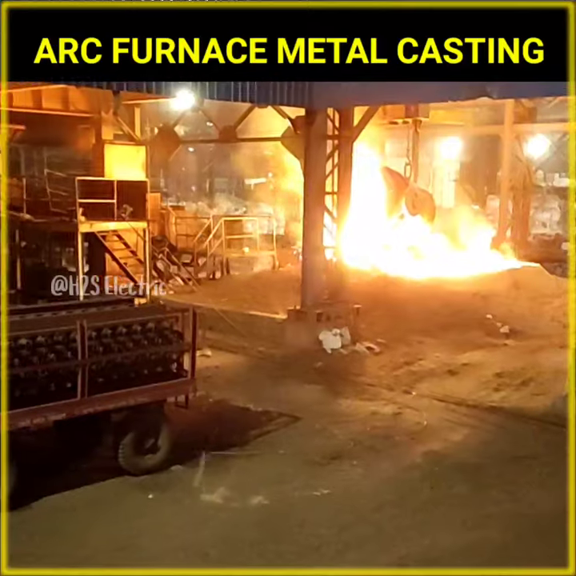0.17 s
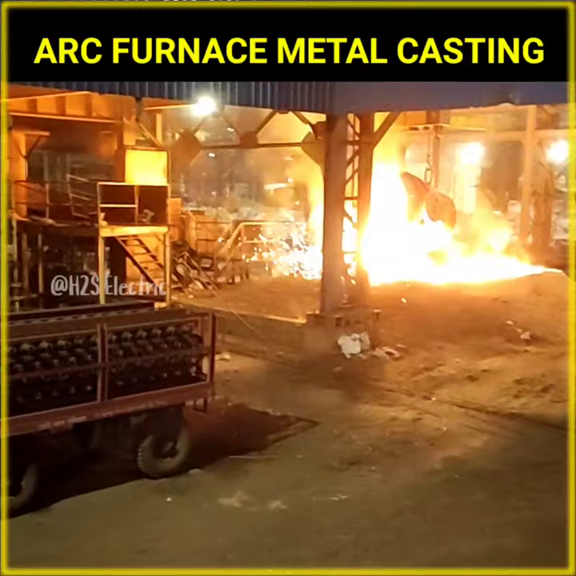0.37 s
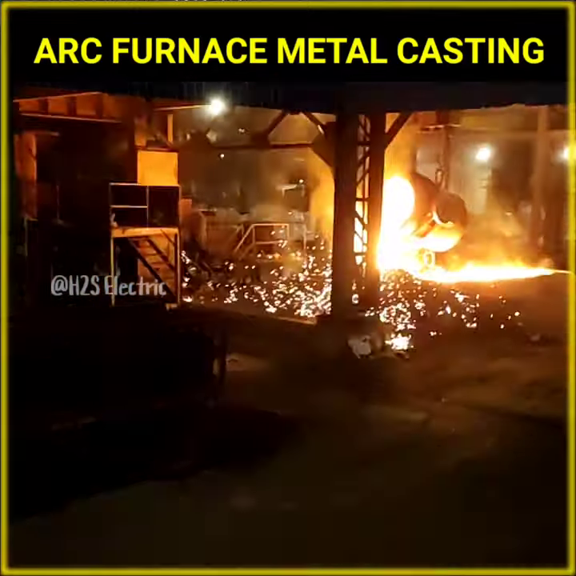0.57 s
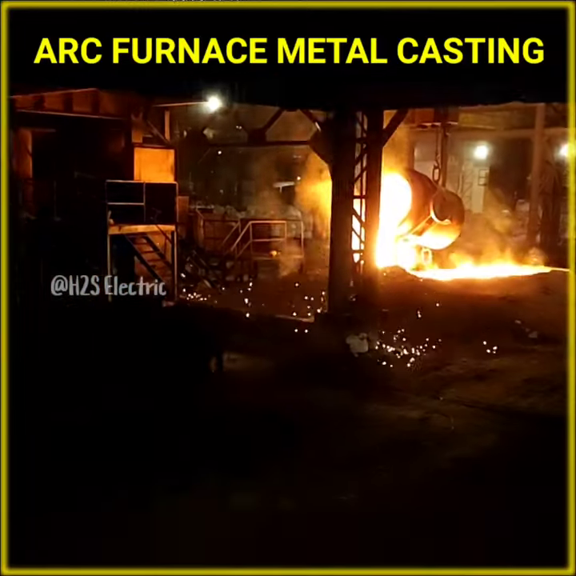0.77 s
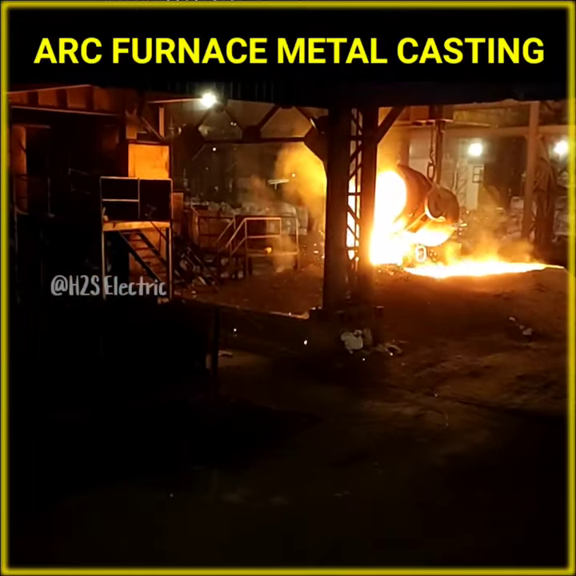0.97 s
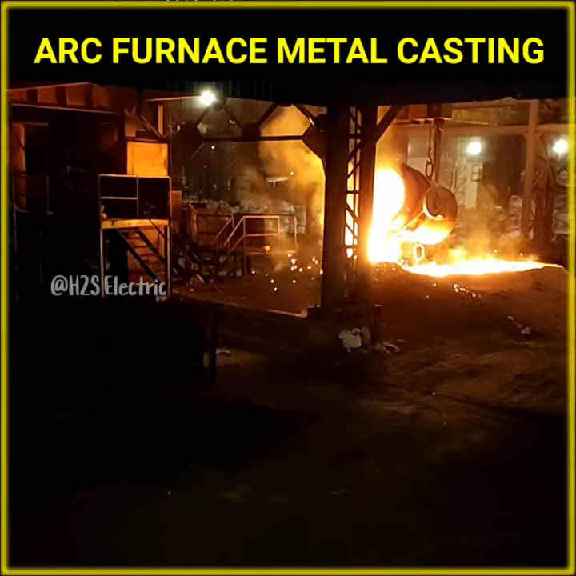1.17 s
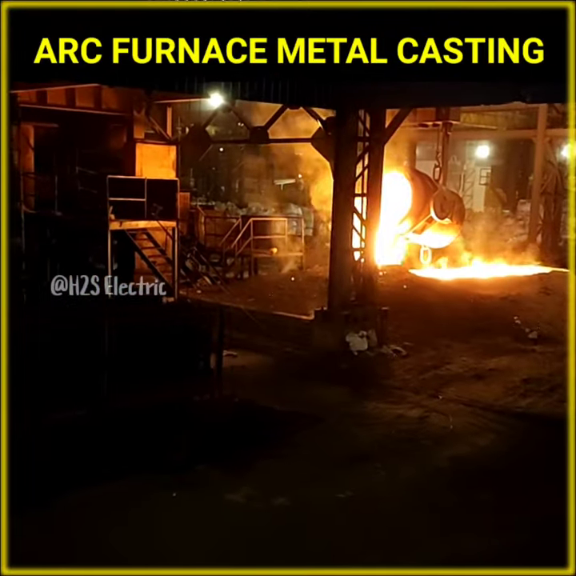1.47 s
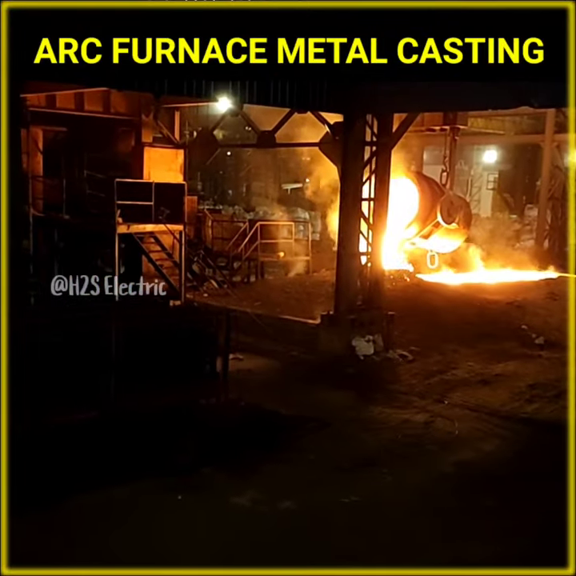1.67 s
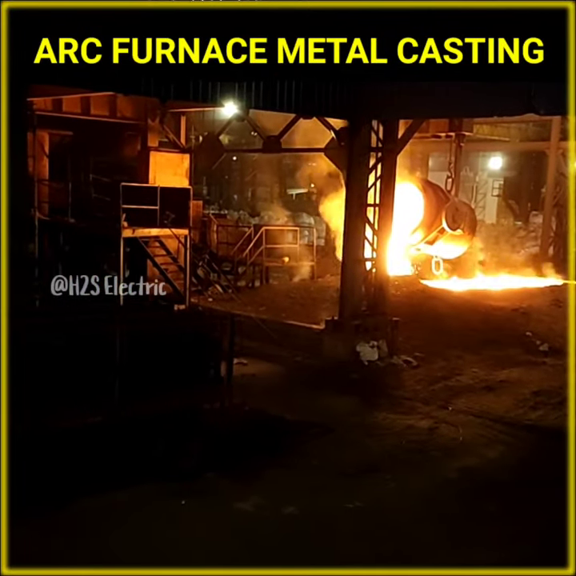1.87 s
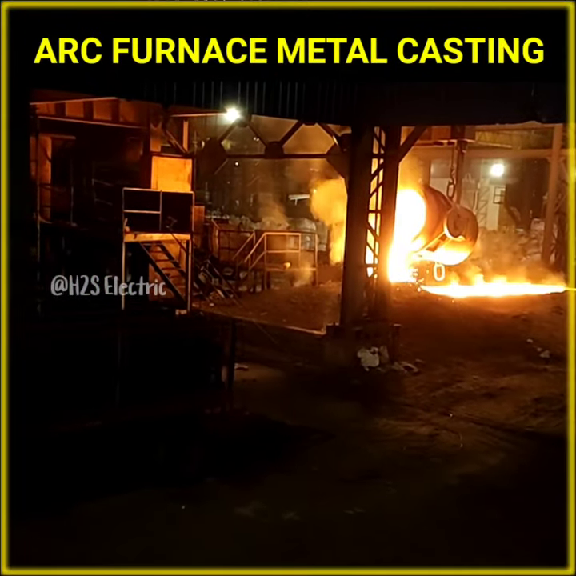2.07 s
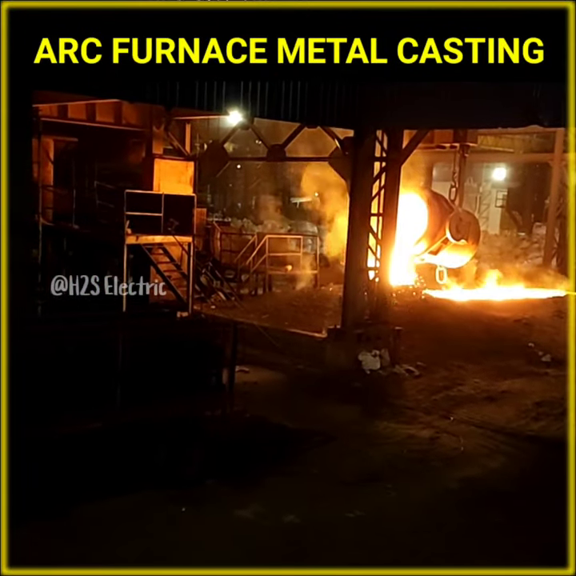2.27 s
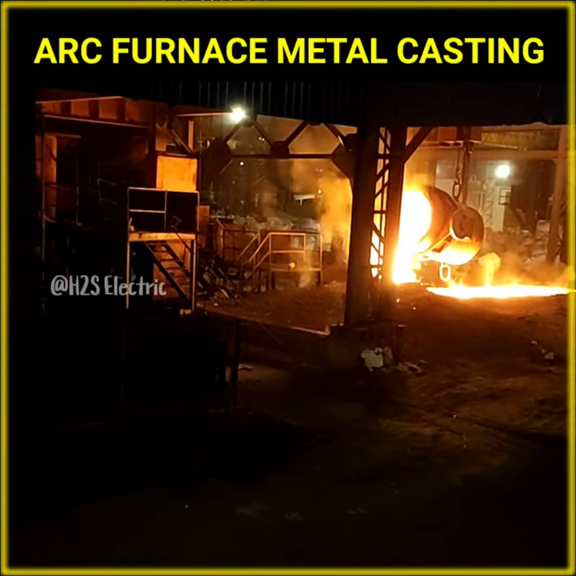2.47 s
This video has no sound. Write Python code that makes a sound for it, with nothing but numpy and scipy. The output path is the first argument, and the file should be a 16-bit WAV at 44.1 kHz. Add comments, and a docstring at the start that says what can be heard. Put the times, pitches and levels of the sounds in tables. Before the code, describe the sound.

A furnace roar comes in at about 0.2 seconds after a brief silence and stays steady, broad and burning, with a low, wavering ring from its shell and motors humming underneath. Faint, distant puffs of air come between 0.3 and 1.2 seconds. At about 2.1 seconds a close valve spits a bright hiss, whistling faintly as it shuts by 2.4. One last far puff follows near 2.6 seconds.

```python
"""After a short silence, two small microphones switch on and fade up in a foundry's furnace hall.
A broad burning roar fills it and makes the furnace shell ring near 350 Hz, over the hum of motors.
A few faint puffs of leaking air sound further off. Just after two seconds, compressed air spits once
through a valve, close and bright, whistling faintly as it shuts. One last far puff follows."""
import sys
import numpy as np
from scipy import signal
from scipy.io import wavfile
from scipy.ndimage import uniform_filter1d, minimum_filter1d

SR = 44100
rng = np.random.default_rng(int(sys.argv[2]) if len(sys.argv) > 2 else 0)


def file_out(sig):
    """Save sig as 16-bit WAV at sys.argv[1]."""
    # one column per channel
    cols = np.atleast_2d(sig).T
    # limit, then scale
    lim = np.clip(cols, -1, 1)
    pcm = np.round(lim * 32767).astype(np.int16)
    wavfile.write(sys.argv[1], SR, pcm)


N = 115983

# How strong the roar is from bass to treble: pitch_hz, level_db
ROAR_COLOUR = [(25, -24.5), (87, -49), (130, -37), (170, -23.5), (250, -15.5), (300, -13.5), (350, -5),
               (430, -13), (620, -16), (750, -17), (1100, -21.5), (1600, -23.5), (2000, -28), (3500, -32),
               (3900, -37.5), (5000, -40), (8500, -46), (10500, -51), (13500, -56), (14200, -57),
               (16000, -71)]
# Small rises and dips of the roar: time_s, level_db
ROAR_LOUDNESS = [(.2, -1), (.35, 0.5), (.45, -1.5), (.6, 0), (.8, 0), (.9, -1.5), (1.0, -1), (1.1, -1),
                 (1.3, 0), (1.45, -1), (1.7, 0), (1.85, -0.5), (1.95, 0.5), (2.07, -0.5), (2.3, -1),
                 (2.42, -0.5), (2.63, 0)]
# How alike the roar is at the two microphones: pitch_hz, likeness_0_to_1
ROAR_LIKENESS = [(25, .7), (90, 0.87), (200, 1), (350, 0.99), (600, 0.77), (1200, 0.78), (2500, 0.35),
                 (5000, 0.36), (9000, 0), (14000, 0.05)]
# Which side the roar leans to: pitch_hz, left_over_right_db
ROAR_BALANCE = [(60, -5.5), (240, 2), (500, -1.5), (1100, 1), (1800, -2.5), (2700, -2), (4200, -3),
                (6400, -2), (9800, .5), (15000, 1.5)]


def furnace_roar(level_db=-22, patch_db=1, flicker_db=0.27, swell_db=0.46):
    """Swirling flame and draught make a broad noise that shifts in patches, flickers and swells."""
    size, hop = 1024, 256
    frame_t, hz = np.arange(N // hop + 5) * hop / SR, np.fft.rfftfreq(size, 1 / SR)
    shape = (len(hz), len(frame_t))
    patches = patch_db * blotches(shape, bands=20, frames=10)
    flicker = flicker_db * blotches(shape, bands=200, frames=3)
    swell = swell_db * drift(5.91, frame_t)
    colour_db = at_pitch(ROAR_COLOUR, hz)[:, None] + patches + flicker - swell
    likeness, balance_db = at_pitch(ROAR_LIKENESS, hz), at_pitch(ROAR_BALANCE, hz)
    noise = stereo_noise(colour_db, size, likeness, right_lag_s=0.00008, balance_db=balance_db)
    return noise * gain_of(level_db + at_time(ROAR_LOUDNESS, np.arange(N) / SR))


# The notes the furnace shell rings at, loudest first: pitch_hz, width_hz, relative_level_db
SHELL_NOTES = [(350.4, 40, -3), (396, 30, -10), (590, 58, -15), (502.4, 40, -16)]
# How loud the whole ringing is: time_s, level_db
SHELL_LOUDNESS = [(.2, -21.5), (.25, -20.5), (.37, -23), (.45, -19.5), (.7, -22), (1.0, -19), (1.25, -21.5),
                  (1.6, -20), (2.02, -20), (2.065, -31), (2.11, -24), (2.17, -22.5), (2.3, -20),
                  (2.45, -22.5), (2.63, -20)]
# Extra level for all notes but the lowest: time_s, boost_db
UPPER_NOTE_BOOST = [(.2, 3), (.3, 4), (.45, 4), (.55, -1), (1.0, -2), (1.45, -1), (1.65, 3), (1.9, 0),
                    (2.1, 3), (2.35, 1), (2.63, 0)]


def shell_ring(wander_share=0.01, steady_s=0.16):
    """The flame shakes the shell, which rings at a few restless notes."""
    t, out = np.arange(N) / SR, np.zeros(N)
    for note, (hz, width_hz, db) in enumerate(SHELL_NOTES):
        pitch = hz * (1 + wander_share * drift(12, t))
        ring = resonate(rng.standard_normal(N), pitch, width_hz)
        ring = resonate(ring, pitch, 2 * width_hz)
        # Even out the slow swings and keep the fast churning.
        slow_power = abs(uniform_filter1d(ring ** 2, round(steady_s * SR)))
        ring = ring / np.sqrt(slow_power + 1e-20)
        boost_db = at_time(UPPER_NOTE_BOOST, t) if note > 0 else 0
        out += gain_of(db + boost_db) * ring
    return out * gain_of(at_time(SHELL_LOUDNESS, t))


# The one spit of air as the valve closes: time_s, level_db, opening_0_to_1
JET_SPIT = [(2.13, -37, 1), (2.137, -29, 1), (2.16, -30.5, 0.7), (2.172, -34.5, 0.4), (2.205, -37, 0.44),
            (2.23, -35.5, 0.3), (2.258, -34, .3), (2.277, -39, 0.25), (2.295, -43.5, 0), (2.36, -48, 0),
            (2.4, -58, 0)]
# The bright hiss of the wide-open valve: pitch_hz, level_db
OPEN_VALVE_COLOUR = [(1500, -10), (3000, 0), (4500, -0.5), (6000, 0.5), (8000, 4.5), (10500, -3),
                     (13500, 4.5), (16000, -5)]
# The duller hiss of the nearly shut valve: pitch_hz, level_db
SHUT_VALVE_COLOUR = [(1500, -23), (3000, -5), (4250, 0), (4650, 3), (5600, -3), (8600, -4), (10500, -13),
                     (13500, -13), (16000, -17)]


def air_jet(whistle_hz=4590, whistle_db=-10):
    """Compressed air bursts through a valve; as it closes, the hiss dulls and the valve seat whistles."""
    size, hop = 256, 64
    frame_t, hz = np.arange(N // hop + 5) * hop / SR, np.fft.rfftfreq(size, 1 / SR)
    t = np.arange(N) / SR
    times, level_db, opening = np.transpose(JET_SPIT)
    open_share = np.interp(frame_t, times, opening)
    bright = gain_of(at_pitch(OPEN_VALVE_COLOUR, hz))[:, None]
    dull = gain_of(at_pitch(SHUT_VALVE_COLOUR, hz))[:, None]
    colour = open_share * bright + (1 - open_share) * dull
    colour = colour / np.sqrt((colour ** 2).mean(0))  # every blend is equally strong
    hiss = stereo_noise(20 * np.log10(colour), size, likeness=0.27, right_lag_s=0.00001)
    whistle = normalize(resonate(rng.standard_normal(N), np.full(N, whistle_hz), width_hz=110))
    whistle *= gain_of(whistle_db) * (1 - np.interp(t, times, opening))
    flowing = (t > times[0]) & (t < times[-1])
    return (hiss + whistle) * gain_of(np.interp(t, times, level_db)) * flowing


# The tones of the motors: pitch_hz, level_db
MOTOR_TONES = [(202.5, -41), (405, -36), (593, -39), (809, -44), (1217, -50), (496, -41)]


def motor_hum(width_hz=5.1, wander_share=0.0017, waver_db=1):
    """The hall smears each motor tone into a narrow, wavering band of noise."""
    t, out = np.arange(N) / SR, np.zeros(N)
    for hz, db in MOTOR_TONES:
        pitch = hz * (1 + wander_share * drift(4.93, t))
        loudness = gain_of(db + waver_db * drift(8, t))
        tone = resonate(rng.standard_normal(N), pitch, width_hz)
        out += loudness * normalize(resonate(tone, pitch, width_hz))
    return out


# Faint puffs of air: start_s, length_s, level_db, pitch_hz
FAR_PUFFS = [(0.32, 0.092, -47, 7500), (0.667, 0.045, -49, 7000), (0.934, 0.058, -50, 7000),
             (1.14, 0.043, -46, 7040), (2.552, 0.074, -46, 7500)]


def distant_puffs(width_hz=3200):
    """Air leaks far away in short hisses, soft at both ends."""
    t, out = np.arange(SR // 5) / SR, np.zeros((2, N + SR))
    for start_s, length_s, db, hz in FAR_PUFFS:
        pitch, start = np.full(len(t), hz), round(start_s * SR)
        hiss = resonate(rng.standard_normal((len(t), 2)).T, pitch, width_hz)
        hiss = normalize(resonate(hiss, pitch, width_hz))
        rise_and_fall = np.sin(np.pi * np.clip(t / length_s, 0, 1))
        out[:, start:start + len(t)] += gain_of(db) * rise_and_fall * hiss
    return out[:, :N]


def gain_of(db):
    """Turns decibels into a number to multiply by."""
    return 10 ** (np.asarray(db) / 20)


def normalize(x):
    """Scales a signal to an average power of 1."""
    return x / np.sqrt(np.mean(x ** 2) + 1e-20)


def at_pitch(table, hz):
    """Reads between a table's rows along a musical (logarithmic) pitch scale."""
    pitches, values = np.transpose(table)
    return np.interp(np.log(hz + 1), np.log(pitches + 1), values)


def at_time(table, t):
    """Reads between a table's rows at the times t."""
    return np.interp(t, *np.transpose(table))


def drift(fastest_hz, t):
    """A slow random wobble around zero, made of 20 waves."""
    rates = np.geomspace(fastest_hz / 20, fastest_hz, num=20)
    wobble = sum(np.sin(2 * np.pi * (hz * t + rng.random())) / np.sqrt(hz) for hz in rates)
    return normalize(wobble - wobble.mean())


def blotches(shape, bands, frames):
    """Random ups and downs, blurred across pitch bands and time frames."""
    specks = rng.standard_normal(shape[::-1]).T
    return normalize(uniform_filter1d(uniform_filter1d(specks, bands, axis=0), frames, axis=1))


def resonate(x, pitch_hz, width_hz):
    """Makes x ring around a pitch that may move; a narrower width rings longer."""
    turn = np.exp(2j * np.pi * np.cumsum(pitch_hz) / SR)
    decay = np.exp(-np.pi * width_hz / SR)
    return 2 * (turn * signal.lfilter([1 - decay], [1, -decay], x / turn)).real


def stereo_noise(colour_db, size, likeness, right_lag_s, balance_db=0):
    """Noise, partly alike at two microphones, shaped by colour_db (pitch bands by time frames)."""
    hz = np.fft.rfftfreq(size, 1 / SR)[:, None]
    likeness, lean = np.reshape(likeness, (-1, 1)), gain_of(balance_db / 2).reshape(-1, 1)
    draws = rng.standard_normal(colour_db.shape[::-1] + (4,)).T
    left, unrelated = draws[0] + 1j * draws[1], draws[2] + 1j * draws[3]
    delayed = left * np.exp(-2j * np.pi * hz * right_lag_s)
    right = likeness * delayed + np.sqrt(1 - likeness ** 2) * unrelated
    spectra = np.array([left * lean, right / lean]) * gain_of(colour_db)
    return normalize(signal.istft(spectra, nperseg=size, noverlap=size * 3 // 4)[1][:, :N])


def scene():
    """The furnace, the motors and the escaping air sound together."""
    return furnace_roar() + shell_ring() + motor_hum() + air_jet() + distant_puffs()


# How the microphones fade up once switched on: time_s, gain_db
MIC_FADE_UP = [(.1545, -5.5), (.19, -6), (.2, 1.5), (.225, 1.5)]


def record(dry, switch_on_s=0.0034, ceiling_db=-9, hold_s=0.0045, smooth_s=0.0043):
    """The microphones switch on and fade up; loud peaks, deep bass and the top treble are held down."""
    t = np.arange(N) / SR
    switch_on = np.sin(np.pi / 2 * np.clip((t - MIC_FADE_UP[0][0]) / switch_on_s, 0, 1)) ** 2
    heard = dry * gain_of(at_time(MIC_FADE_UP, t)) * switch_on
    safe_gain = np.minimum(gain_of(ceiling_db) / (abs(heard).max(0) + 1e-9), 1)
    hold, smooth = round(hold_s * SR), round(smooth_s * SR)
    limited = heard * uniform_filter1d(minimum_filter1d(safe_gain, hold + smooth), smooth)
    lowest_hz, highest_hz = 92, 15650
    bass_cut = signal.butter(2, lowest_hz, "high", fs=SR, output="sos")
    treble_cut = signal.firwin(511, highest_hz, window=("kaiser", 9), fs=SR)
    return signal.oaconvolve(signal.sosfilt(bass_cut, limited), treble_cut[None], "same")


dry = scene()
out = record(dry)
file_out(out)
```